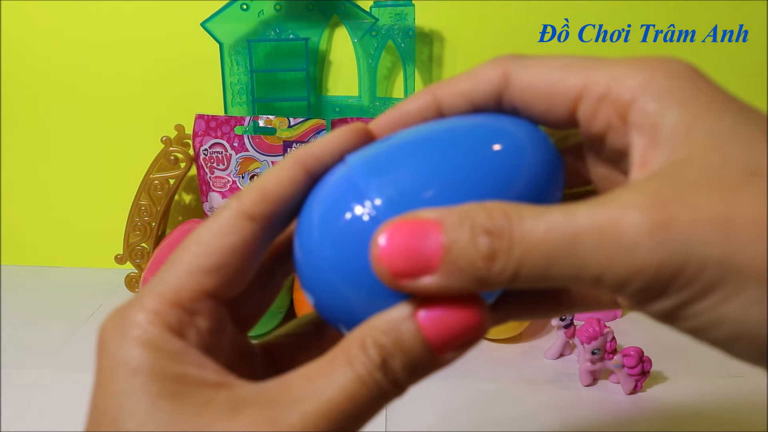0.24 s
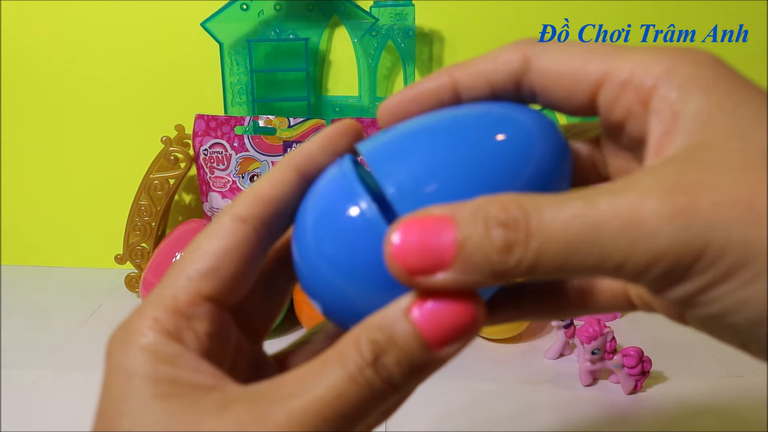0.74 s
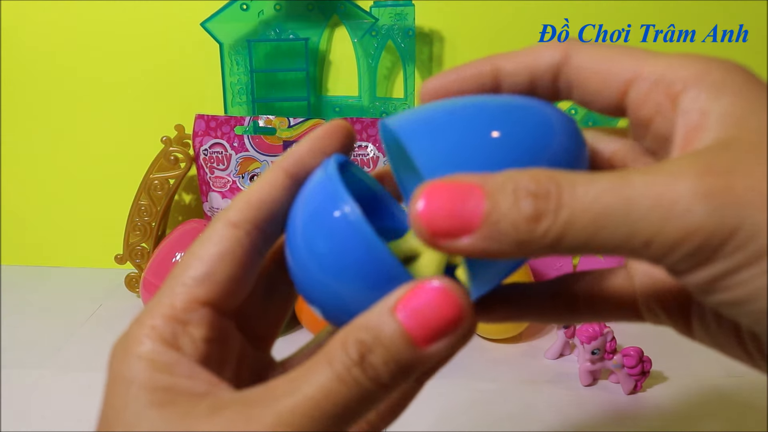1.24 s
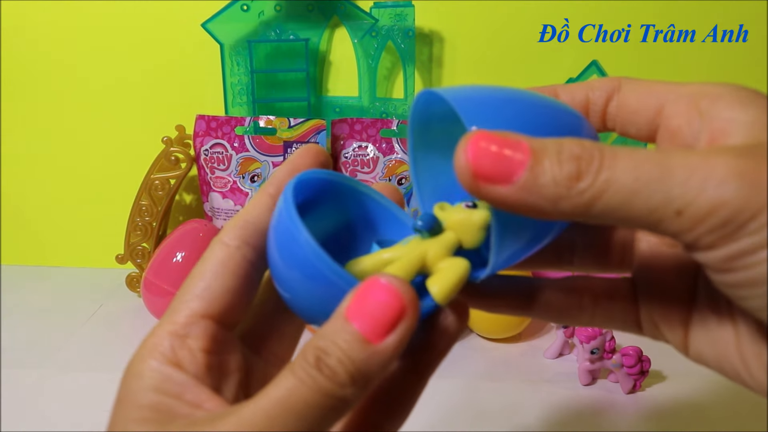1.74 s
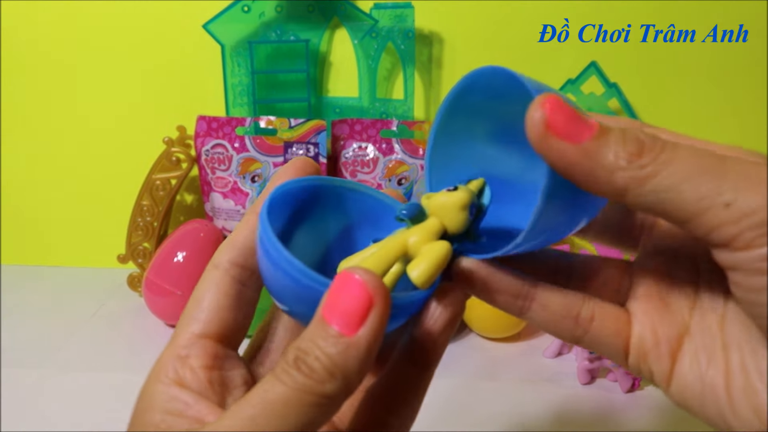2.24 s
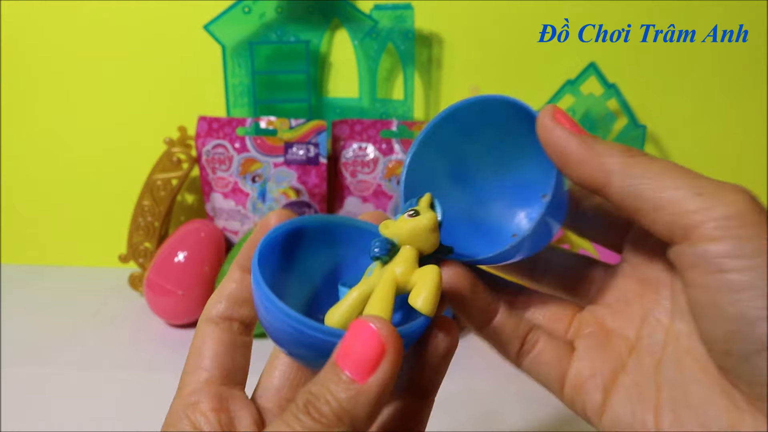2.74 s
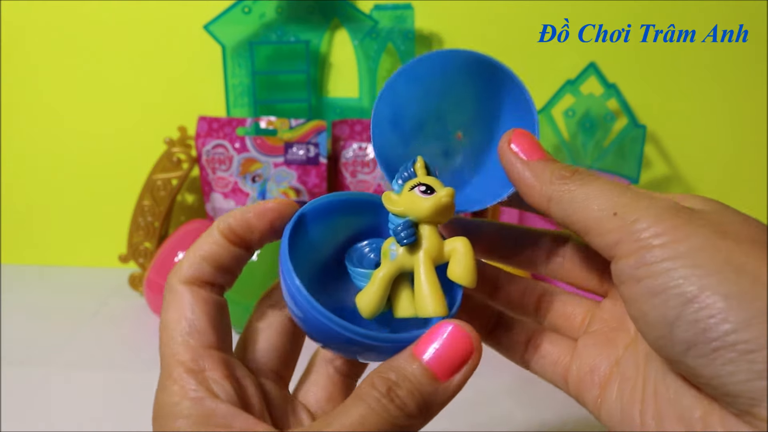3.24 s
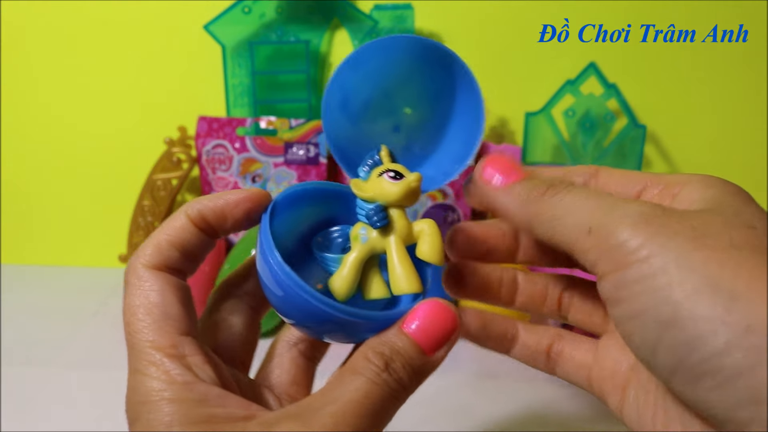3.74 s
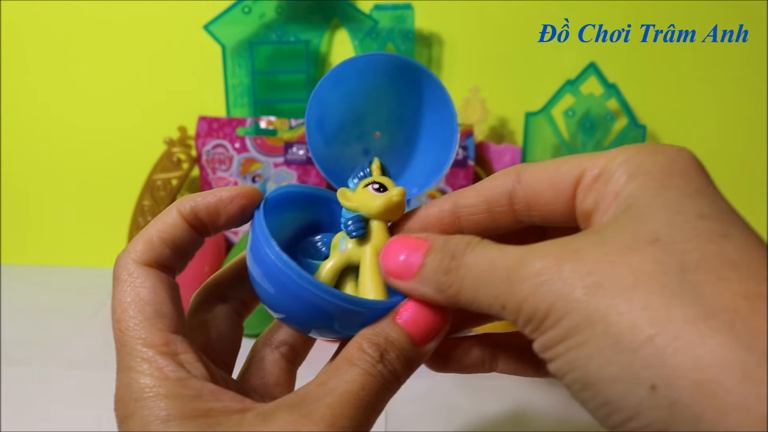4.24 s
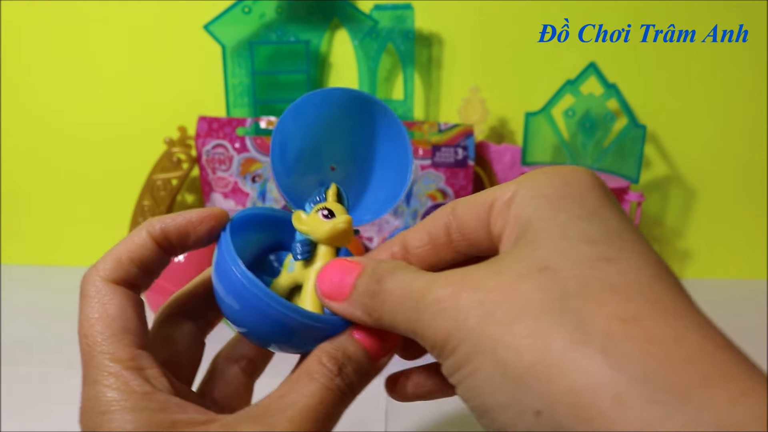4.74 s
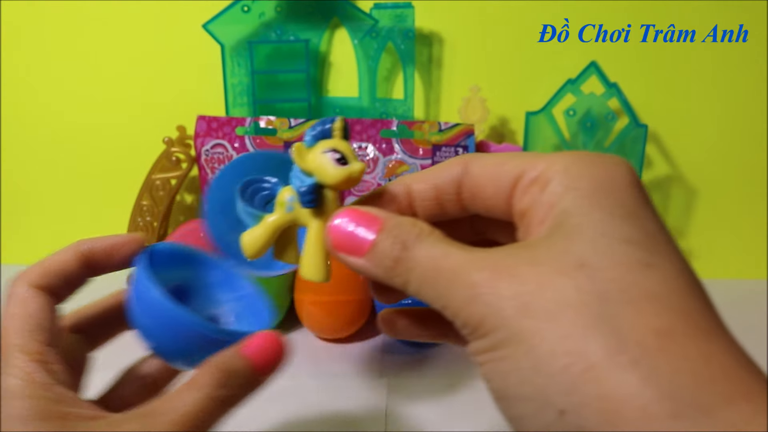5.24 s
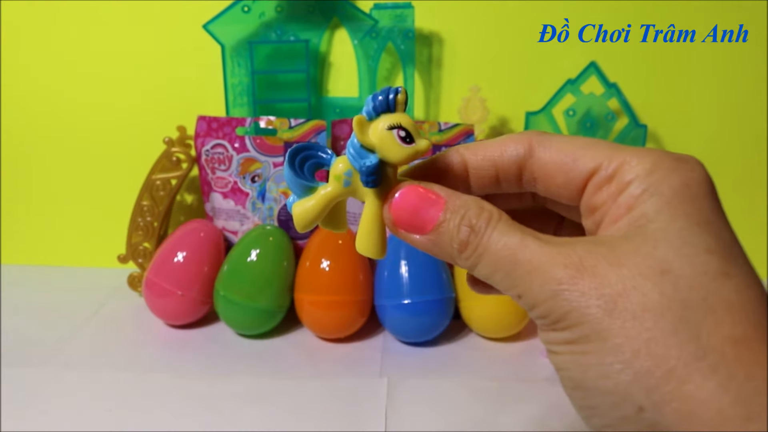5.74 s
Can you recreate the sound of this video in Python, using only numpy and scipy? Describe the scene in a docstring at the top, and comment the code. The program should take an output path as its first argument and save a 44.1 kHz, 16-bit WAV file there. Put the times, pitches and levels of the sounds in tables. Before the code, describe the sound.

Hands snap open a hollow plastic toy egg, with light scrapes and taps, then a half knocks on a table over faint hum.

```python
"""In a small room with a faint hum, two hands pry open a hard plastic toy egg close to the microphone.
First the seam snaps and the rims slip and scrape, which makes the shell and the air inside it ring.
As the gap widens, that hollow rings higher. Fingers rub and tap the shell and pick out a small figure.
Last, an empty half is set down on the table to the left, where it knocks and briefly rocks."""
import sys
import numpy as np
from scipy import signal
from scipy.fft import rfft, irfft, next_fast_len
from scipy.io import wavfile

SR = 44100
rng = np.random.default_rng(int(sys.argv[2]) if len(sys.argv) > 2 else 0)


def wrap_up_sound(samples):
    """Save the sound to the file named by the first command line argument, as 16-bit audio."""
    columns = np.atleast_2d(samples).T
    # keep every value between -1 and 1, then stretch to whole-number steps
    tamed = np.clip(columns, -1, 1)
    steps = np.round(tamed * 32767).astype(np.int16)
    wavfile.write(sys.argv[1], SR, steps)


N = 263717

# steady noise of the room: pitch_hz, level_db
AIR_NOISE = [(15, -43), (25, -27), (45, -13.5), (108, -6.5), (170, -8), (285, -8), (420, -10), (600, -11.5),
             (1130, -14), (1700, -16), (2760, -18.5), (10400, -24.5), (14000, -30), (16000, -31.5)]
# how alike the two sides are in sound from all around: pitch_hz, likeness (0 to 1)
STEREO_LIKENESS = [(60, 0.47), (150, 0.26), (380, 0.15), (950, 0.081), (2380, 0.01), (5980, 0.0097),
                   (15000, 0.02)]
# tones of the steady hum: pitch_hz, level_db
HUM_TONES = [(119.5, -76), (360, -75.5), (479.6, -63)]
# scrapes over the shell: peak_s, length_s, level_db, grit (0 = skin, 1 = plastic edge)
SCRAPES = [(0.005, 0.037, -39, 1), (0.396, 0.017, -44, 0.82), (0.458, 0.024, -38, 0.73),
           (0.681, 0.043, -29, 0.02), (1.514, 0.1, -39.5, 0.54), (2.498, 0.086, -38.5, 0.34),
           (2.672, 0.079, -42, 0.79), (2.81, 0.043, -38, 0.93), (2.851, 0.042, -36.5, 0.51),
           (3.02, 0.34, -45, 0.75), (4.087, 0.11, -46, 0.11), (4.633, 0.051, -38.5, 0.81),
           (4.77, 0.022, -43.5, 0.1), (5.006, 0.047, -36, 0.34)]
# deep ringing of the shell: pitch_hz, width_hz, level_db
SHELL_MODES = [(90, 120, -23), (543, 34, -13.5), (860, 153, -6), (1292, 604, -0.5), (1870, 560, -10.5),
               (2630, 490, -9)]
# overtones of the shell: pitch_hz, width_hz, level_db
SHELL_OVERTONES = [(4530, 140, -20.5), (5770, 1300, -18.5), (8430, 480, -22.5), (10680, 340, -24.5)]
# the hollow's note, rising as the halves part, then shaded by the hands: time_s, pitch_hz
HOLLOW_PITCH = [(0.15, 214), (0.47, 477), (0.66, 545), (0.705, 916), (0.8, 980), (1.4, 1480), (2.1, 1750),
                (2.5, 2180), (2.85, 2270), (2.9, 1880), (3.12, 1765), (4.06, 2270), (4.29, 1940),
                (4.6, 2580), (5.0, 2170)]
# the hollow rings when shut, is choked by a slit and rings again when open: pitch_hz, sharpness_q
HOLLOW_SHARPNESS = [(225, 4.4), (480, 2.8), (570, 1.4), (900, 7), (1500, 7.2), (1820, 12.7), (2300, 6.9)]
# higher ringing of the thin rims: pitch_hz, width_hz, level_db
RIM_MODES = [(2420, 260, -11), (3190, 460, -13), (3920, 1100, -2.5), (4870, 206, 1), (7260, 790, -12),
             (10800, 700, -10)]
# sharp tick of a hard edge: pitch_hz, width_hz, level_db
TICK_MODES = [(6360, 1400, -1.5), (9300, 820, 1.5), (10960, 1100, 2), (13600, 1500, -1)]
# echoes from palms, table top and near walls: left_delay_s, right_delay_s, level_db
NEAR_ECHOES = [(0.0014, 0.0008, -34), (0.0080, 0.0098, -30), (0.0099, 0.0082, -19), (0.0186, 0.016, -26.5)]
# tone of the room's fading echo: pitch_hz, level_db
ROOM_TONE = [(80, -26), (230, -2.5), (500, -14.5), (1300, -12.5), (2700, -14), (4000, -8), (6000, -9.5),
             (10000, -3.5), (16000, -11)]
# the lip of the seam catches and jumps: start_s, shell_db, hollow_db, rim_db
SEAM_SNAPS = [(0.0596, 24, -8, -5), (0.1164, -18, -12, -21), (0.1203, 3.5, 5, -23), (0.1221, 1.5, 17, 2),
              (0.384, -19.5, -10.5, -22), (0.4642, -8.5, 3, -32), (0.4724, -5, -19, -27),
              (0.4740, 1.5, 4, -20), (0.4762, -7, -11, -12)]
# smooth rubs along the rim that make only the hollow sing: peak_s, length_s, level_db
SMOOTH_RUBS = [(0.45, 0.025, -30), (0.715, 0.044, -25.5), (0.79, 0.06, -39), (1.355, 0.11, -33.5),
               (1.6, 0.09, -36.5), (2.12, 0.05, -42), (3.055, 0.074, -33.5), (3.113, 0.02, -23)]
# soft fingertip pats: start_s, level_db
FINGER_PATS = [(0.4745, -14), (0.633, -3), (0.658, -3), (0.687, -4), (2.628, -7), (2.771, -12), (3.94, -7),
               (4.963, -8.5)]
# the shell under a pat, muffled by the hand: pitch_hz, width_hz, level_db
CUPPED_MODES = [(293, 170, -1), (402, 39, 3)]
# a nail or the figure taps the shell: start_s, level_db
HARD_TAPS = [(0.633, -15.5), (0.666, -10), (0.687, -10), (1.6432, -13), (1.9042, -15), (2.6283, -15.5),
             (3.1155, -10), (3.939, -22.5), (4.062, -15.5), (4.2895, -6.5), (4.52, -19), (4.963, -24)]
# a hard edge drags along the rim and flicks off it: flick_s, level_db, drag_s
EDGE_FLICKS = [(3.1179, -15.5, 0.021), (3.1794, -8, 0.0027)]
# the empty half hits the table: start_s, knock_db, thud_db, clack_db, tick_db
TABLE_HITS = [(5.8782, -35, -39, -30, -37), (5.8808, 16, 4, 13, -42), (5.8935, -17, -4, -26, -30),
              (5.9055, -20, -23, -26, -33), (5.913, -17, -31, -30, -30), (5.9312, -3, -4.5, -34, -41),
              (5.948, -11, -8, -35, -35)]
# knock of the shell on the table: pitch_hz, width_hz, level_db
KNOCK_MODES = [(1245, 190, -1), (1390, 200, -1), (1920, 98, 2)]
# low thud of the table: pitch_hz, width_hz, level_db
TABLE_MODES = [(104, 18, 6.5), (184, 49, 5.5), (350, 140, 7.5), (440, 46, 2), (704, 75, 3)]
# brief clack of the landing rim: pitch_hz, width_hz, level_db
CLACK_MODES = [(2550, 450, -9), (3120, 380, 0)]
# dense after-ring of the table's board: pitch_hz, level_db
BOARD_TONE = [(60, -35), (100, -22), (200, -16), (330, -10), (600, -2.5), (950, -3.5), (1250, -2),
              (1900, 2.5), (2150, -41), (3100, -25), (3600, -48), (8000, -35.5)]


def from_db(db):
    """Turn decibels into a gain."""
    return 10 ** (np.asarray(db) / 20)


def unit_power(x):
    """Scale a signal to an average power of 1."""
    return x / np.sqrt(np.mean(x ** 2) + 1e-20)


def at_hz(points, hz):
    """Read between a table's rows on a musical (logarithmic) pitch scale."""
    pitches, values = np.transpose(points)
    return np.interp(np.log(hz + 1), np.log(pitches), values)


def coloured(noise, tone):
    """Make each pitch in a noise as strong as a table says."""
    n = noise.shape[-1]
    size = next_fast_len(n)
    gain = from_db(at_hz(tone, np.fft.rfftfreq(size, 1 / SR)))
    return irfft(rfft(noise, size) * gain, size)[..., :n]


def surround_noise(size):
    """Stereo noise from all around: partly alike in the bass, unrelated in the treble."""
    n = next_fast_len(size)
    mid, side = rfft(rng.standard_normal((2, n)))
    alike = np.clip(at_hz(STEREO_LIKENESS, np.fft.rfftfreq(n, 1 / SR)), 0, 1)
    spectrum = np.sqrt((1 + alike) / 2) * mid + np.sqrt((1 - alike) / 2) * side * [[1], [-1]]
    return irfft(spectrum, n)[:, :size]


def drift(rate_hz):
    """A random wander of about size 1 that turns about rate_hz times a second."""
    position = np.arange(N) / SR * rate_hz
    return unit_power(np.interp(position, np.arange(N), rng.standard_normal(N)))


def clicks(table, column=1):
    """One instant push per row, at the level in the given column."""
    force = np.zeros(N)
    for row in table:
        force[min(round(row[0] * SR), N - 1)] += from_db(row[column])
    return force


def resonator(hz, width_hz):
    """A filter that rings at one pitch; the narrower it is, the longer it rings."""
    decay = np.exp(-np.pi * width_hz / SR)
    feedback = [1, -2 * decay * np.cos(2 * np.pi * hz / SR), decay ** 2]
    return (1 - decay ** 2) / 2 * np.array([1, 0, -1]), feedback


def ring(force, modes, polarity=-1):
    """A pushed object rings at its own pitches (modes); polarity -1 flips every second one."""
    force = force + 1e-12 * rng.standard_normal(N)
    return sum(polarity ** k * from_db(db) * signal.lfilter(*resonator(hz, width_hz), force)
               for k, (hz, width_hz, db) in enumerate(modes))


def low_pass(x, hz, order=6):
    """Dull the sound above hz; a higher order cuts more steeply."""
    return signal.sosfilt(signal.butter(order, hz, fs=SR, output="sos"), x)


def delayed(x, delay_s):
    """The same sound, later."""
    return np.interp(np.arange(N) - delay_s * SR, np.arange(N), x, left=0)


def convolved(x, tail):
    """Give every moment of a mono sound a stereo tail."""
    return signal.fftconvolve(x[None], tail, axes=1)[:, :N]


def swells(rows):
    """Power that swells and fades; each row is peak_s, rise_s, fall_s, level_db."""
    t, power = np.arange(N) / SR, np.zeros(N)
    for peak_s, rise_s, fall_s, db in rows:
        near = slice(max(int((peak_s - 4 * rise_s) * SR), 0), int((peak_s + 4 * fall_s) * SR))
        since = t[near] - peak_s
        power[near] += from_db(db) ** 2 * np.exp(-(since / np.where(since < 0, rise_s, fall_s)) ** 2)
    return power


def air_and_hum(air_db=-54.5, waver_db=0.1):
    """Steady air noise and a slightly wavering hum fill the room."""
    t, hum = np.arange(N) / SR, np.zeros(N)
    for hz, db in HUM_TONES:
        peak = np.sqrt(2) * from_db(db + waver_db * drift(3.91))
        hum += peak * np.sin(2 * np.pi * hz * t + 0.42 * drift(3.51))
    return from_db(air_db) * unit_power(coloured(surround_noise(N), AIR_NOISE)) + hum


def friction(power, slips_per_s, spread_db, judder_db=0.5):
    """Rubbing is many tiny slips of uneven size, whose strength follows the given power."""
    sizes = from_db(spread_db * rng.standard_normal(N) + judder_db * drift(220))
    slips = (rng.random(N) < slips_per_s / SR) * rng.choice([-1, 1], N) * sizes
    return np.sqrt(power) * unit_power(slips)


def rubbing(rows, rise_share=0.64):
    """Power of hand movements that swell, then fade a little faster."""
    return swells((peak_s, length_s * rise_share, length_s * (1 - rise_share), db)
                  for peak_s, length_s, db in rows)


def scraping(skin_db, edge_db):
    """Power that scrapes feed into one part of the egg, from bare skin to a plastic edge."""
    return rubbing((peak_s, length_s, db + skin_db + grit * (edge_db - skin_db))
                   for peak_s, length_s, db, grit in SCRAPES)


def shell(taps, flicks):
    """Snaps, taps, flicks and scrapes bend the shell, which rings deeply with faint overtones."""
    gentle_taps = low_pass(taps, hz=2250, order=2)
    force = clicks(SEAM_SNAPS) + gentle_taps + from_db(-5.5) * flicks
    rub_power = scraping(skin_db=-7.5, edge_db=-5.5) + seam_chatter(column=1)
    force += friction(rub_power, slips_per_s=3000, spread_db=6)
    deep = low_pass(ring(force, SHELL_MODES, polarity=1), hz=3050, order=8)
    return deep + ring(force, SHELL_OVERTONES)


def hollow(taps, flicks, block=128):
    """The air between the halves rings at a pitch and a sharpness that follow the gap."""
    force = clicks(SEAM_SNAPS, column=2) + from_db(4.5) * taps + from_db(4) * flicks
    rub_power = scraping(skin_db=0, edge_db=-2) + seam_chatter(column=2)
    rub_power += rubbing(SMOOTH_RUBS) + shifting_fingers()
    force += friction(rub_power, slips_per_s=4000, spread_db=1.5) + 1e-12 * rng.standard_normal(N)
    air, state = np.zeros(N), np.zeros(2)
    starts = np.arange(0, N, block)
    pitch = np.interp(starts / SR, *np.transpose(HOLLOW_PITCH))
    for i, hz, q in zip(starts, pitch, at_hz(HOLLOW_SHARPNESS, pitch)):
        air[i:i + block], state = signal.lfilter(*resonator(hz, hz / q), force[i:i + block], zi=state)
    return low_pass(air, hz=2830, order=1)


def rims(taps, flicks):
    """The thin rims ring high, stirred far more by plastic than by skin."""
    force = clicks(SEAM_SNAPS, column=3) + from_db(-16) * taps + from_db(-27) * flicks
    rub_power = scraping(skin_db=-25.5, edge_db=-2.5) + seam_chatter(column=3) + edge_drag()
    force += friction(rub_power, slips_per_s=7000, spread_db=1)
    return low_pass(ring(force, RIM_MODES, polarity=1), hz=8200, order=2)


def edge_ticks(taps, flicks):
    """Hard edges tick when struck and crackle when scraped."""
    force = from_db(-30.5) * clicks(SEAM_SNAPS) + from_db(-26) * taps + flicks
    rub_power = scraping(skin_db=-30.5, edge_db=-12.5) + edge_drag()
    force += friction(rub_power, slips_per_s=9300, spread_db=10)
    return ring(force, TICK_MODES)


def room_echo(x, fade_s=0.27, treble_fade_s=0.22, build_s=0.00055):
    """Near surfaces echo; the room adds a tail that drops 60 dB in fade_s, its treble sooner."""
    t = np.arange(SR // 2) / SR
    noise = coloured(surround_noise(len(t)), ROOM_TONE)
    low = signal.sosfiltfilt(signal.butter(2, 3500, fs=SR, output="sos"), noise)
    fade = from_db(-60 * t / fade_s)
    treble = (noise - low) * from_db(-60 * t / treble_fade_s)
    tail = (low * fade + treble) * (1 - np.exp(-t / build_s))
    near = sum(from_db(db) * np.array([delayed(x, left_s), delayed(x, right_s)])
               for left_s, right_s, db in NEAR_ECHOES)
    return convolved(x, tail / np.sqrt(np.sum(fade ** 2))) + near


def seam_chatter(column, rise_s=0.004, fall_s=0.0034, clean_break_db=15):
    """Power of the lip sticking and slipping around each snap; a hard snap frees it at once."""
    return swells((snap[0], rise_s, fall_s, snap[column] - 26.5)
                  for snap in SEAM_SNAPS if snap[1] < clean_break_db)


def finger_pats():
    """Soft fingertips pat the cupped shell, which gives a low, muffled note."""
    return ring(clicks(FINGER_PATS), CUPPED_MODES)


def shifting_fingers(start_s=1.15, end_s=5.1, level_db=-53.5, swing_db=4):
    """Power of the faint, uneven rubbing while the egg is held."""
    t = np.arange(N) / SR
    return (t > start_s) * (t < end_s) * from_db(level_db + swing_db * drift(12)) ** 2


def edge_drag(fall_s=0.0071):
    """Power of a hard edge dragging along the rim up to each flick."""
    return swells((flick_s, drag_s, fall_s, db - 32) for flick_s, db, drag_s in EDGE_FLICKS)


def edge_flicks(rebound_s=0.0052, rebound_db=-5):
    """The push of an edge that flicks off the rim and touches once more."""
    force = clicks(EDGE_FLICKS)
    return force + from_db(rebound_db) * delayed(force, rebound_s)


def table_landing(board_db=-29.5, fade_s=0.18, dull_hz=1930):
    """The empty half knocks on the table and rocks; returns the blow and the board's after-ring."""
    force = clicks(TABLE_HITS)
    knock = ring(force, KNOCK_MODES, polarity=1)
    thud = ring(clicks(TABLE_HITS, column=2), TABLE_MODES, polarity=1)
    bump = low_pass(knock + thud, dull_hz, order=8)
    # the knock carries no deep bass below about 70 Hz
    bump = signal.sosfilt(signal.butter(2, 70, "high", fs=SR, output="sos"), bump)
    clack = low_pass(ring(clicks(TABLE_HITS, column=3), CLACK_MODES), hz=3680)
    tick = ring(clicks(TABLE_HITS, column=4), TICK_MODES)
    t = np.arange(SR // 2) / SR
    board = coloured(surround_noise(len(t)), BOARD_TONE) * from_db(-60 * t / fade_s)
    return bump + clack + tick, from_db(board_db) * convolved(force, board)


def scene(body_right_db=0.94, edges_right_db=1.3):
    """The egg is in front, leaning a little right; the landing reaches the left side first."""
    taps, flicks = clicks(HARD_TAPS), edge_flicks()
    body = shell(taps, flicks) + hollow(taps, flicks) + finger_pats()
    edges = rims(taps, flicks) + edge_ticks(taps, flicks)
    blow, board = table_landing()
    egg = body * from_db([[-body_right_db], [body_right_db]])
    egg += np.array([np.roll(edges, 1), edges]) * from_db([[-edges_right_db], [edges_right_db]])
    table = np.array([blow, delayed(blow, 7 / SR)]) + board
    return air_and_hum() + egg + room_echo(body + edges + blow) + table


def record(dry):
    """The loudest snap overloads the input, and the treble above 15900 Hz is cut."""
    clipped = np.clip(dry, -1, 1)
    return signal.sosfilt(signal.ellip(10, .1, 70, 15900, fs=SR, output="sos"), clipped)


dry = scene()
out = record(dry)
wrap_up_sound(out)
```